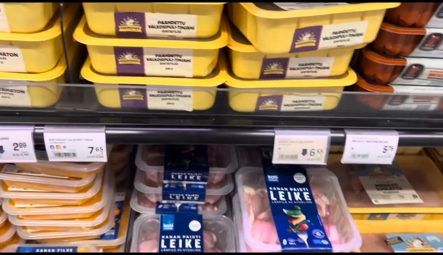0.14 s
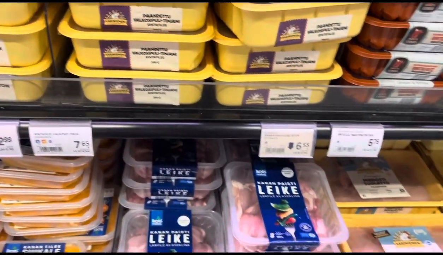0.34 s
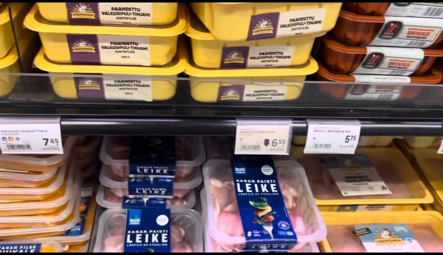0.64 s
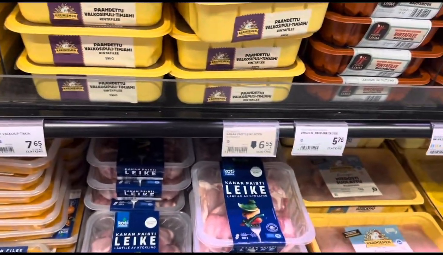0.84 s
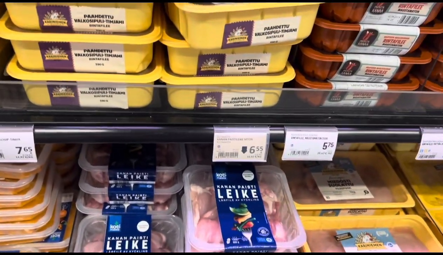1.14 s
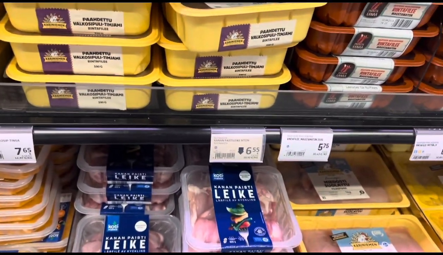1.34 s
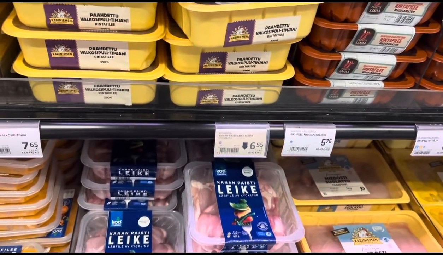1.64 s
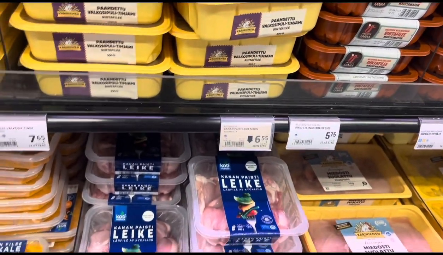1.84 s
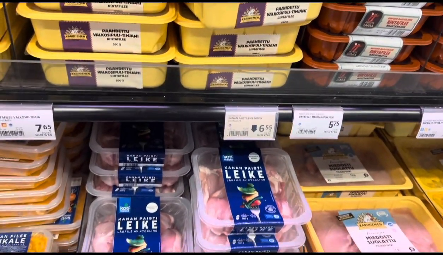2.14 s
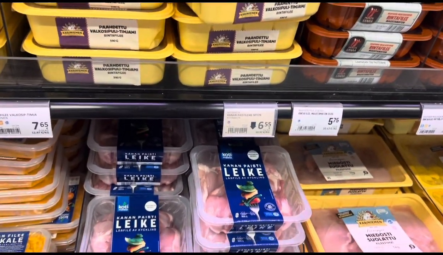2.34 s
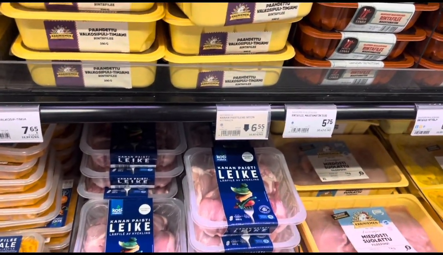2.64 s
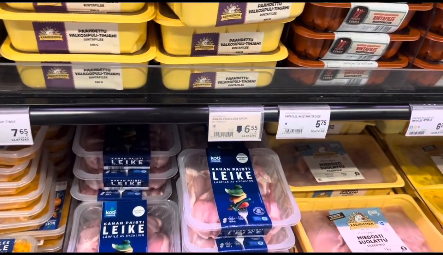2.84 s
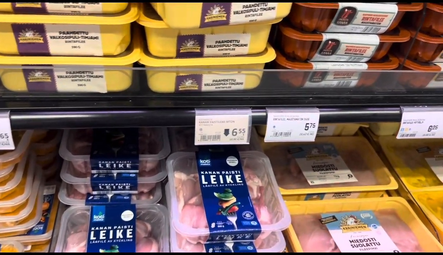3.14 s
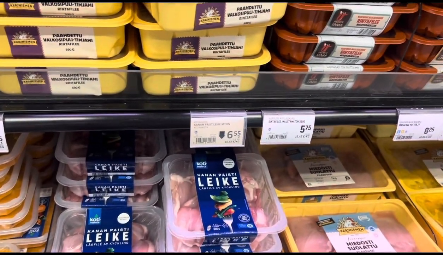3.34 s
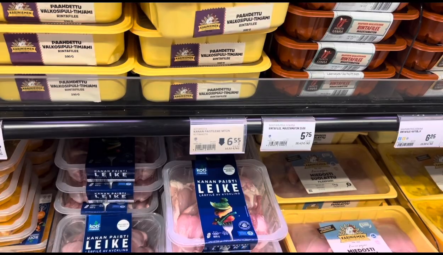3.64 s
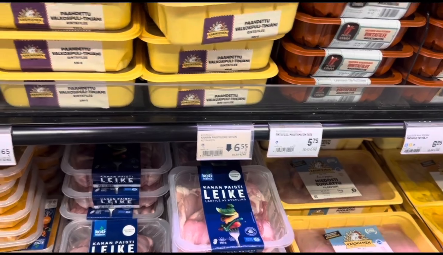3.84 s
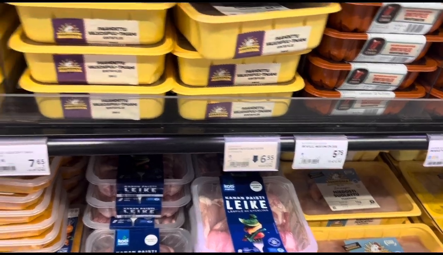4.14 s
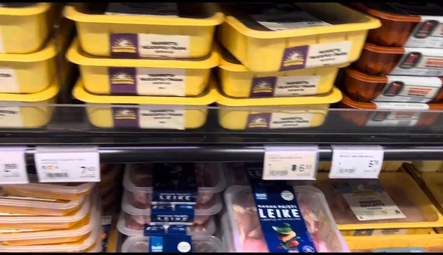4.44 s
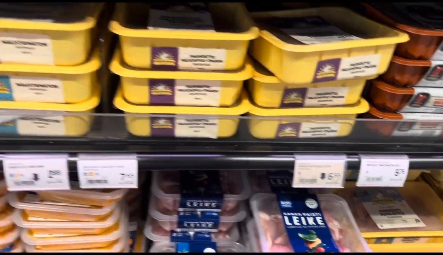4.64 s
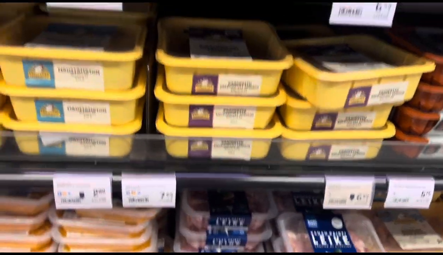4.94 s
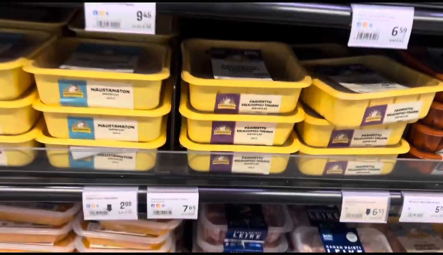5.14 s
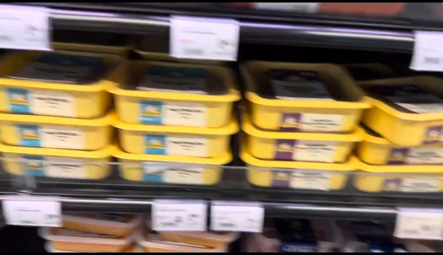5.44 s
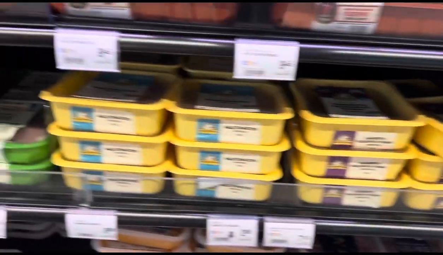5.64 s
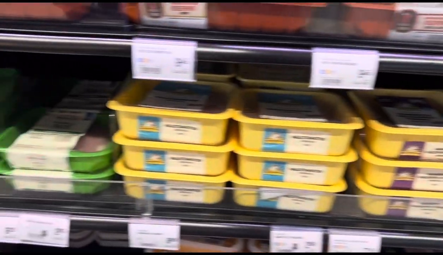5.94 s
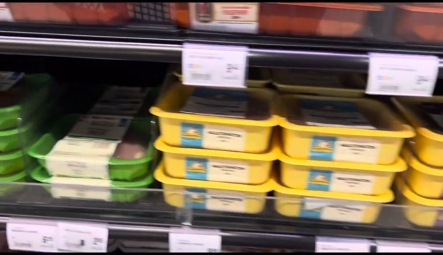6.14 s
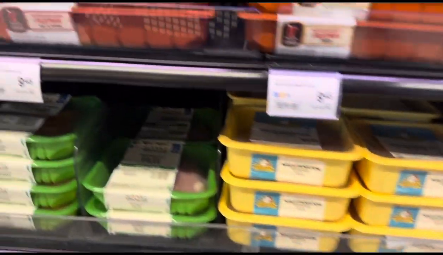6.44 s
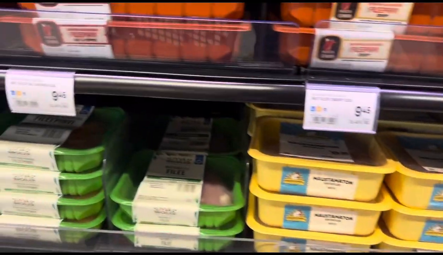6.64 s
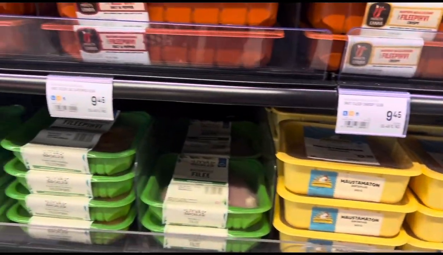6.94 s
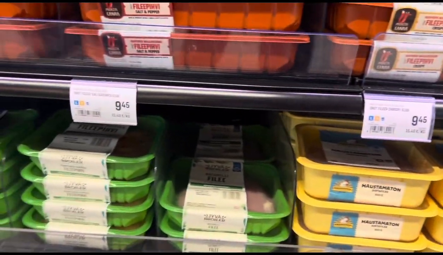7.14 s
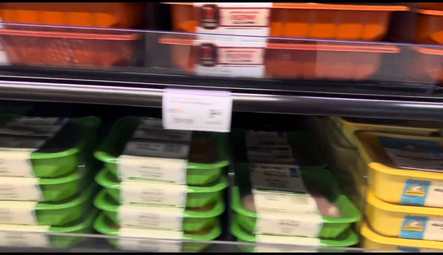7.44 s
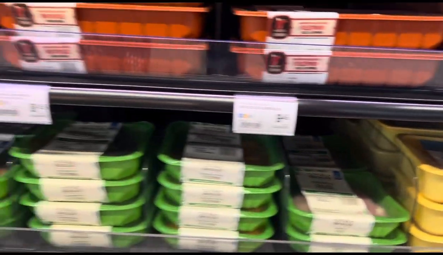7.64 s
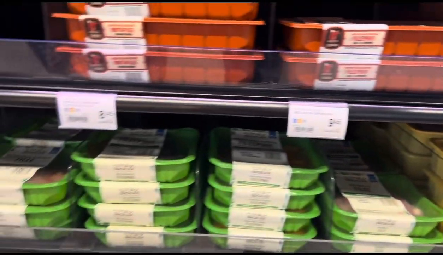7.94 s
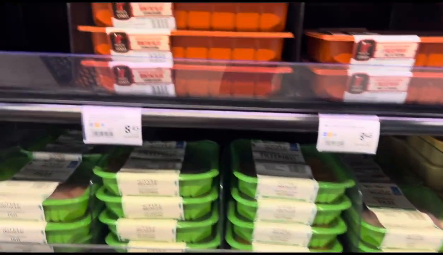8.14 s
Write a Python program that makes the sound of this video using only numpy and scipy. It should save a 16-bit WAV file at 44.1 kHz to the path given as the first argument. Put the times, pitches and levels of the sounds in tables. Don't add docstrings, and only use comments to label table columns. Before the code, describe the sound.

Throughout, open chillers in a large hard-surfaced shop aisle give a deep, bassy air roar with a low wavering fan hum and very faint thin motor whines, heard on a handheld stereo microphone. Bags and cloth rustle softly all along. A light scuff comes at 0.5 seconds, then a quick cluster of hollow plastic knocks from 0.75 to 0.95. Dry, hissy shoe scuffs follow around 1.4 and 1.9, the sharpest at 2.3, another at 2.7. Near 3.8 and 4.0 a trolley wheel gives two tiny, high squeals, the second lower. Softer scuffs and swishes continue to 5.5. From about 5.9 to 7.5 plastic packs clatter again, irregularly, strongest near 6.5 and 6.8, with duller rustling and a crisp scuff at 7.5. A last scuff falls at 7.9, and the chiller drones on until 8.3.

```python
import sys
import numpy as np
from scipy import signal
from scipy.fft import rfft, irfft
from scipy.io import wavfile
from scipy.ndimage import uniform_filter1d

SR = 44100
rng = np.random.default_rng(int(sys.argv[2]) if len(sys.argv) > 2 else 0)


def gain_from_decibels(decibels):
    exponent = np.asarray(decibels, float) / 20
    return 10 ** exponent


def dump_mix(stems):
    frames = np.atleast_2d(stems).T
    limited = np.clip(frames, -1, 1)
    pcm = np.round(limited * 32767).astype(np.int16)
    wavfile.write(sys.argv[1], SR, pcm)


N = 366294
T = np.arange(N) / SR
HZ = np.maximum(np.arange(N // 2 + 1) * SR / N, 1.0)


def rms_one(x):
    return x / np.sqrt(np.mean(x ** 2) + 1e-20)


def in_time(rows):
    s, *columns = np.transpose(rows)
    return [np.interp(T, s, column) for column in columns]


def at_hz(points):
    hz, level_db = np.transpose(points)
    return gain_from_decibels(np.interp(np.log(HZ), np.log(hz), level_db))


def drift(rate_hz):
    pole = np.exp(-80 * np.pi * rate_hz / SR)
    noise = rng.standard_normal(N // 40 + 4002)
    slow = signal.lfilter([1], [1, -2 * pole, pole * pole], noise)[4000:]
    return np.interp(np.arange(N) / 40, np.arange(len(slow)), rms_one(slow))


# (frequency [Hz], side minus mid level [dB])
SIDE_SHARE = [(25, -28), (50, -14), (110, -13), (250, -10.5), (450, -3.5), (800, -1), (1450, 1.5),
              (2100, -3), (3500, -3.5), (5000, -3), (6500, -4), (9500, 1.5), (16000, -1.5)]


def to_ports(mid, side):
    side = irfft(rfft(side) * at_hz(SIDE_SHARE), N)
    return np.array([mid + side, mid - side])


def diffuse(colour):
    mid, side = irfft(rfft(rng.standard_normal((2, N))) * colour, N)
    return to_ports(mid, side) / np.std(mid)


def pan(db):
    return gain_from_decibels(np.array([[db / 2], [-db / 2]]))


def tone(hz, width_hz, flutter_db):
    phase = 2 * np.pi * np.cumsum(hz + width_hz * drift(2.95)) / SR
    return np.sqrt(2) * gain_from_decibels(flutter_db * drift(2.7)) * np.sin(phase)


def whistle(hz, width_hz):
    resonance = 1 / (1 + (2 * (HZ - hz) / width_hz) ** 2)
    band = irfft(rfft(rng.standard_normal(N)) * resonance, N)
    return rms_one(gain_from_decibels(2.4 * drift(3.8)) * band)


def burst(s, rise_s, t60_s):
    age = np.maximum(T - s, 0)
    return (1 - np.exp(-age / max(rise_s, 1e-4))) * gain_from_decibels(-60 * age / max(t60_s, 0.01))


def ring(push, hz, t60_s):
    r = gain_from_decibels(-60 / (t60_s * SR))
    w = 2 * np.pi * hz / SR
    return signal.lfilter([0, np.sin(w)], [1, -2 * r * np.cos(w), r * r], push)


def patchy(x, depth_db):
    cells = signal.stft(x, SR, nperseg=512)[2]
    field = rng.standard_normal(cells.shape[1:])
    field = uniform_filter1d(field, size=9, axis=0)
    field = uniform_filter1d(field, size=7, axis=1)
    return signal.istft(cells * gain_from_decibels(depth_db * rms_one(field)), SR, nperseg=512)[1][:, :N]


# (time [s], air roar level [dB], blade tone level [dB], third blade harmonic level [dB])
CHILLER = [(0.0, -34.5, -34.5, -47), (0.16, -34, -31, -38), (0.6, -32.5, -37, -46), (0.67, -34, -58, -37.5),
           (0.78, -33, -26.5, -33.5), (0.92, -33, -40.5, -48), (1.09, -33, -37.5, -36.5),
           (1.2, -33.5, -34, -51), (1.59, -32.5, -37, -38.5), (1.87, -33.5, -39, -41),
           (2.38, -33.5, -35, -38), (2.56, -33.5, -52, -38.5), (2.7, -32, -39, -47),
           (2.91, -33.5, -41, -38.5), (3.45, -34.5, -35, -44.5), (3.58, -32.5, -37, -36.5),
           (3.98, -34, -37, -48), (4.33, -33, -34, -39.5), (5.11, -33.5, -43.5, -44),
           (5.2, -33.5, -37, -42), (5.37, -34.5, -49, -46), (5.57, -33, -37.5, -40), (5.8, -33, -41.5, -50),
           (6.82, -32, -35, -42.5), (6.94, -32.5, -39, -53), (7.77, -34.5, -39, -43), (8.24, -34, -36, -46),
           (8.31, -34, -45, -50)]
# (frequency [Hz], level [dB per Hz])
AIR = [(18, -30), (32, -19), (50, -10), (70, -3.5), (95, -3), (150, -3), (260, -9), (340, -8.5), (520, -17),
       (900, -22.5), (1150, -28), (1700, -37.5), (4000, -40), (9000, -60)]
# (multiple of blade rate [1], level [dB])
BLADE_ORDERS = [(2, -43.5), (4, -52.5), (5, -54.5)]
# (frequency [Hz], level [dB], width [Hz])
WHINES = [(48.4, -48.5, 2.2), (1400, -67, 12), (2456, -71, 28), (3930, -74, 30), (4050, -68.5, 15),
          (4110, -73, 21)]


def chiller():
    air_db, first_db, third_db = in_time(CHILLER)
    air = gain_from_decibels(air_db + 1.0 + 0.67 * drift(4.3)) * diffuse(at_hz(AIR))
    blade_hz = 108.54
    turn = 2 * np.pi * np.cumsum(blade_hz + 0.5 * drift(1.546)) / SR
    tones = np.zeros(N)
    for order, level_db in [(1, first_db), (3, third_db)] + list(BLADE_ORDERS):
        gain = np.sqrt(2) * gain_from_decibels(level_db + 3.1 * drift(6.1))
        tones += gain * np.sin(order * turn + 0.62 * drift(4.16))
    for hz, level_db, width_hz in WHINES:
        tones += gain_from_decibels(level_db) * whistle(hz, width_hz)
    return air + to_ports(tones, gain_from_decibels(-14.0) * np.roll(tones, 300))


# (time [s], length [s], frequency [Hz], level [dB])
SQUEAKS = [
    (3.783, .16, 7850, -62),
    (3.97, .12, 7300, -61),
]


def squeaks():
    out = np.zeros(N)
    for s, length_s, hz, level_db in SQUEAKS:
        swell = np.sin(np.pi * np.clip((T - s) / length_s, 0, 1)) ** 0.5
        out += gain_from_decibels(level_db) * tone(hz, 40, flutter_db=-2) * swell
    return out


# (time [s], bright swish level [dB], dull swish level [dB], topmost hiss level [dB])
RUSTLE = [(0.0, -68, -58, -83), (0.18, -63.5, -52, -86), (0.46, -62, -55, -70), (0.6, -53, -52, -58),
          (0.69, -56, -53, -58), (0.81, -69, -40, -69), (0.97, -58, -52, -69), (1.09, -65.5, -59, -76),
          (1.32, -60, -57, -71), (1.48, -52, -52, -72), (1.64, -64, -56, -79), (2.31, -66, -54, -78),
          (2.5, -63, -54, -72), (2.66, -58, -53, -67), (2.8, -57, -51.5, -64), (3.03, -60, -51, -68),
          (3.19, -60, -55, -71), (3.49, -55, -52.5, -63), (3.77, -60.5, -53, -69), (3.98, -54.5, -55, -57),
          (4.09, -53.5, -60, -57), (4.19, -50.5, -50.5, -58.5), (4.3, -57.5, -52, -61),
          (4.44, -59, -64, -70), (4.51, -64, -54, -83), (4.74, -66, -55, -85), (4.9, -60, -56, -69),
          (5.04, -59.5, -52, -68), (5.23, -63, -53, -80), (5.46, -64, -56, -68), (5.62, -58.5, -56, -62),
          (5.74, -60.5, -57, -67), (6.06, -55, -45, -60), (6.22, -63, -56, -66), (6.45, -69, -50, -77),
          (6.61, -57, -44, -60.5), (6.8, -59, -43, -59), (6.96, -59, -46.5, -63), (7.12, -61, -48, -67),
          (7.38, -60, -58, -62), (7.47, -51, -42, -56), (7.59, -60, -58, -71), (7.72, -73, -53, -77),
          (7.96, -71, -61, -87), (8.07, -58.5, -59, -65), (8.31, -62, -55, -69)]
# (frequency [Hz], level [dB per Hz])
BRIGHT = [(1500, -1), (3000, -0.5), (4500, 2.5), (7000, 1.5), (8800, -1.5), (9600, -12), (10500, -47)]
DULL = [(600, -20), (1200, -6), (2000, 1), (3500, -14.5), (6000, -13), (10000, -40)]
TOPMOST = [(8500, -35), (9600, 4.5), (11000, 1), (13000, -1), (15500, 5), (16500, -8)]
# (time [s], peak level [dB], rise [s], t60 [s],
# share of dull swish [dB], share of topmost hiss [dB])
SCUFFS = [(0.524, -42.5, 0.005, 0.64, -22, -7), (0.9534, -52.5, 0.0045, 0.26, -10, -4),
          (1.373, -36, 0.0045, 0.37, -15, -10), (1.454, -32, 0.005, 0.19, -19, -12),
          (1.8362, -45.5, 0.0056, 0.84, -15, -7), (1.8871, -35, 0.0066, 0.5, -21, -10),
          (2.2954, -26, 0.0036, 0.19, -12, -13), (2.5894, -44, 0.005, 0.17, -10, -19),
          (2.6833, -30, 0.004, 0.22, -6, -12), (2.833, -40, 0.005, 0.36, -17, -12),
          (3.7304, -45, 0.005, 0.25, -10, -16), (4.2642, -40.5, 0.005, 0.2, -8, -15),
          (4.3405, -47.5, 0.005, 0.49, -10, -15), (4.6528, -55, 0.005, 0.25, -10, -21),
          (4.758, -45, 0.0045, 0.13, -10, -15), (4.9536, -46.5, 0.0046, 0.21, -8, -10),
          (4.9974, -63, 0.005, 0.28, -10, -14), (5.214, -46, 0.005, 0.11, -3, -25),
          (5.4695, -48.5, 0.0046, 0.2, -10, -18), (6.0003, -45, 0.005, 0.48, -8, -15),
          (6.4194, -47, 0.0055, 0.9, -6, -9), (7.335, -40, 0.005, 0.9, -4, -8),
          (7.475, -29.5, 0.0046, 0.21, -18, -17), (7.6184, -56, 0.0047, 0.47, -10, -20),
          (7.914, -37, 0.0043, 0.31, -10, -15)]


def rustle():
    bright_db, dull_db, top_db = in_time(RUSTLE)
    bright = gain_from_decibels(2 * bright_db + 2.9 * drift(19.0))
    dull = gain_from_decibels(2 * dull_db - 10.5)
    top = gain_from_decibels(2 * top_db + 3.0 * drift(14.0))
    for s, peak_db, rise_s, t60_s, dull_share_db, top_share_db in SCUFFS:
        power = (gain_from_decibels(peak_db - 5) * burst(s, rise_s, t60_s)) ** 2
        bright = bright + power
        dull = dull + power * gain_from_decibels(2 * dull_share_db)
        top = top + gain_from_decibels(2 * top_share_db + 10.5) * power * burst(s, 0.001, 1.0)
    hiss = np.sqrt(bright) * diffuse(at_hz(BRIGHT)) + np.sqrt(top) * diffuse(at_hz(TOPMOST))
    swish = np.sqrt(dull) * diffuse(at_hz(DULL))
    return patchy(gain_from_decibels(0.77 * drift(120.0)) * hiss + swish, depth_db=2.5)


# (time [s], peak level [dB], own ring [Hz], t60 [s],
# crack level [dB], left minus right level [dB])
CLATTER = [(0.7494, -37, 1820, 0.13, -7, -6), (0.7801, -19.5, 1470, 0.11, -4, 6),
           (0.8091, -27, 1860, 0.1, -10, 2.0), (0.829, -36, 1900, 0.12, -8, 1.5),
           (0.8565, -24, 1850, 0.1, -20, 4), (0.8844, -41, 1670, 0.11, -9, -3),
           (0.9244, -30, 1460, 0.1, -6, 1), (5.8674, -34, 2460, 0.14, -5, -1),
           (6.018, -28, 1450, 0.092, -8, -6), (6.0794, -37, 2070, 0.1, -3, -3),
           (6.4285, -32.5, 1430, 0.086, -3, -4), (6.4655, -18, 1430, 0.091, -8, 0),
           (6.6744, -24.5, 1980, 0.087, -6, 1.0), (6.7544, -31, 1410, 0.1, -6, -4),
           (6.7736, -21.5, 1770, 0.14, -19, -8), (6.7944, -36, 1460, 0.11, -7, 0.0),
           (6.814, -23.5, 1430, 0.1, -14, -1.0), (6.8578, -30, 1510, 0.11, -13, 1),
           (6.977, -25, 1490, 0.087, -7, -3), (7.045, -26, 1530, 0.1, -19, 2.0),
           (7.396, -28, 1530, 0.12, -9, -4), (7.506, -29, 2330, 0.1, -3, 1.0)]
# (frequency [Hz], level [dB], t60 [s])
PACK = [(1480, 7.5, 0.018), (1860, 7, .015), (2340, 6.5, 0.0081), (3010, 2, 0.0075), (4800, 8, 0.0043)]


def clatter():
    out = np.zeros((2, N))
    crackle = rng.standard_normal((2, N)) * gain_from_decibels(6.2 * drift(140.0))
    crack_band = signal.butter(3, [900, 6800], "band", fs=SR, output="sos")
    crackle_band = signal.butter(2, [800, 4200], "band", fs=SR, output="sos")
    lag = 14
    for s, peak_db, own_hz, t60_s, crack_db, pan_db in CLATTER:
        near = slice(round(s * SR), round((s + 0.4) * SR))
        push = signal.sosfilt(crackle_band, (crackle * burst(s, 0.00044, t60_s))[:, near])
        body = push + gain_from_decibels(-17.5) * ring(push, own_hz, 0.025)
        for hz, level_db, ring_s in PACK:
            body = body + gain_from_decibels(level_db - 23) * ring(push, hz, ring_s)
        crack = signal.sosfilt(crack_band, (crackle * burst(s, 0.00016, 0.022))[:, near])
        knock = body / np.std(body[:, :400]) + gain_from_decibels(crack_db) * crack / np.std(crack[:, :200])
        direct, scattered = knock
        ports = np.array([direct + 0.5 * scattered, np.roll(direct, lag) - 0.5 * scattered])
        out[:, near] += gain_from_decibels(peak_db - 10) * ports * pan(pan_db)
    return out


def aisle(x):
    t60_s, wash_db, first_echo_s = 0.49, -19.5, 0.008
    t = T[:SR]
    tail = rng.standard_normal((2, SR)) * gain_from_decibels(-60 * t / t60_s) * (t > first_echo_s)
    tail = tail / np.sqrt(np.sum(tail[0] ** 2))
    return gain_from_decibels(wash_db) * signal.fftconvolve(x, tail, axes=1)[:, :N]


def scene():
    packs = clatter()
    return chiller() + squeaks() + rustle() + packs + aisle(packs)


def low_pass(x):
    return signal.sosfilt(signal.butter(12, 17000, fs=SR, output="sos"), x)


# (frequency [Hz], left minus right level [dB])
PORT_BALANCE = [(60, 1.5), (110, -1), (200, 0.0), (380, 0.0), (700, 2), (1290, 1.0), (2380, 0.0), (4400, 4),
                (8120, -0.5), (15000, 0.5)]


def record(dry):
    lean = np.sqrt(at_hz(PORT_BALANCE))
    left, right = irfft(rfft(dry) * np.array([lean, 1 / lean]), N)
    mid_side = np.array([left + right, left - right]) / 2
    hz, _, cells = signal.stft(mid_side, SR, nperseg=2048)
    comb_from_hz, top_hz, port_lag_s = 6560, 15850, 1 / 3850
    turn = np.pi * hz * port_lag_s
    comb = np.sqrt(2) * np.abs([np.cos(turn), np.sin(turn)])
    treble = np.clip((hz - comb_from_hz) / 500, 0, 1)
    cells = cells * ((1 - treble + treble * comb) * (hz < top_hz))[:, :, None]
    power = uniform_filter1d(np.abs(cells) ** 2, size=2, axis=1)
    loudest = np.percentile(power[0, hz > comb_from_hz], 80, axis=0)
    floor_db, below_loudest_db = -99.0, -20
    keep = power > gain_from_decibels(2 * floor_db) + gain_from_decibels(2 * below_loudest_db) * loudest
    keep = keep | (treble == 0)[:, None]
    mid, side = signal.istft(cells * keep, SR, nperseg=2048)[1][:, :N]
    return low_pass(np.array([mid + side, mid - side]))


dry = scene()
out = record(dry)
dump_mix(out)
```